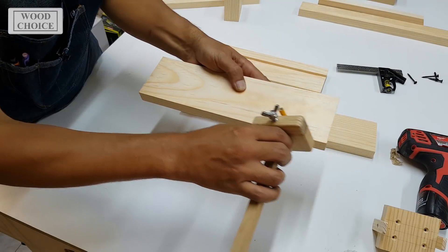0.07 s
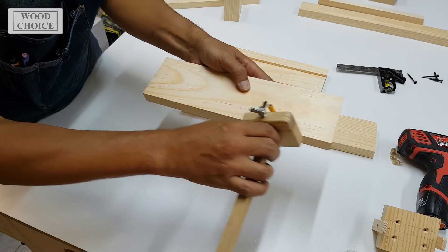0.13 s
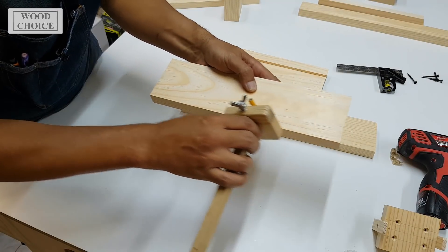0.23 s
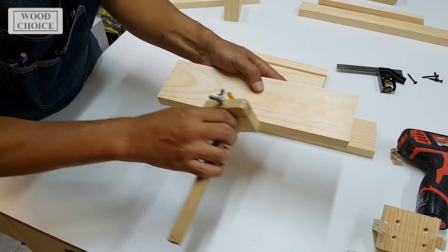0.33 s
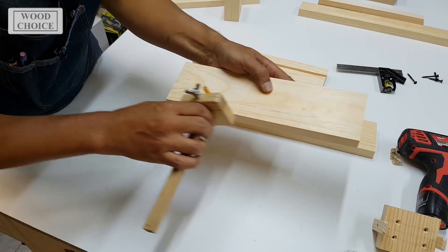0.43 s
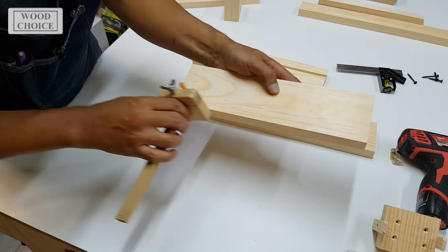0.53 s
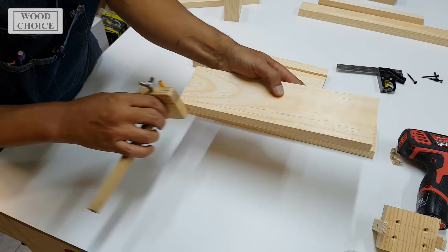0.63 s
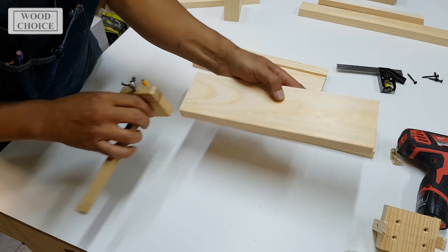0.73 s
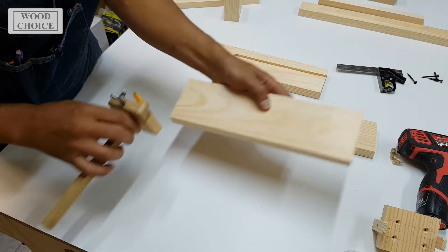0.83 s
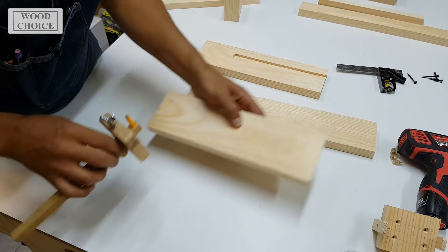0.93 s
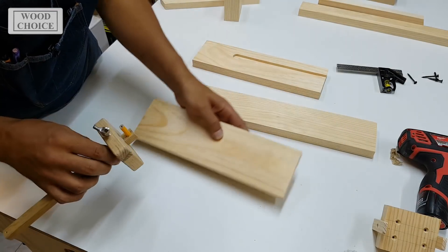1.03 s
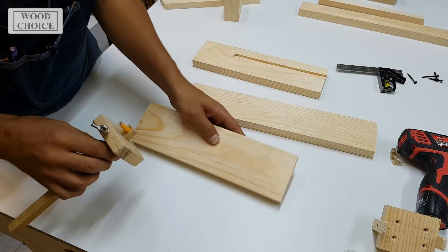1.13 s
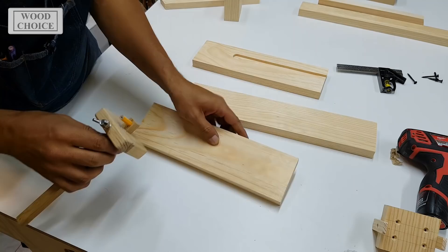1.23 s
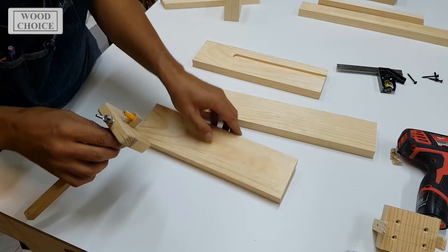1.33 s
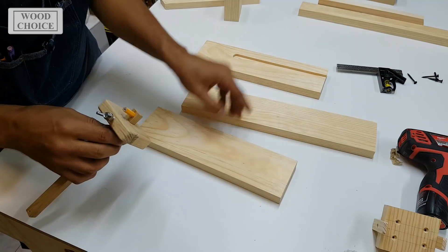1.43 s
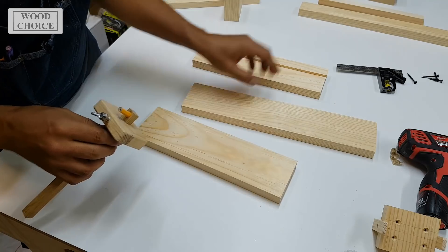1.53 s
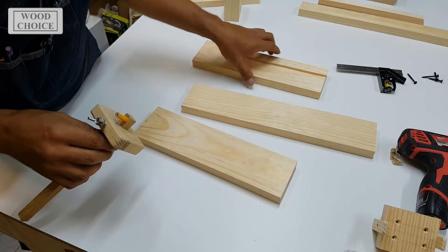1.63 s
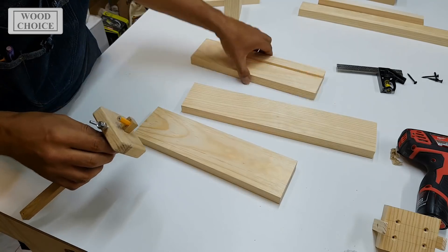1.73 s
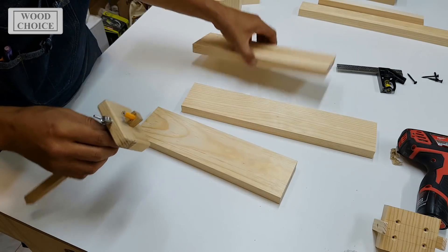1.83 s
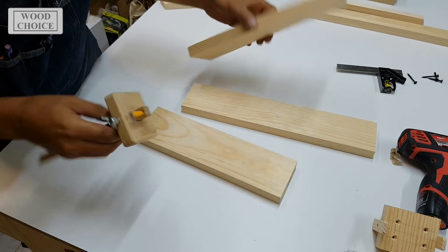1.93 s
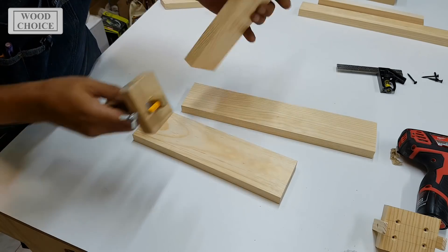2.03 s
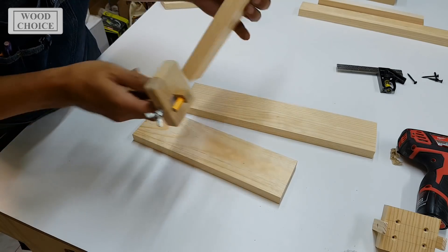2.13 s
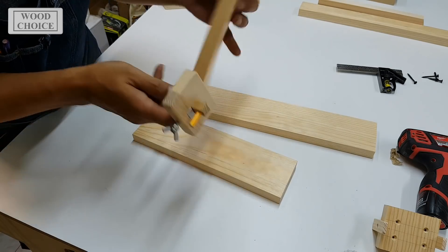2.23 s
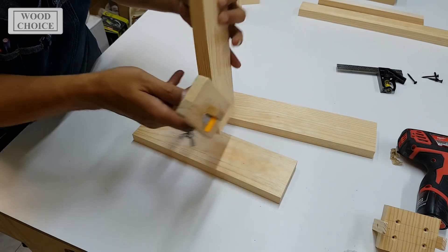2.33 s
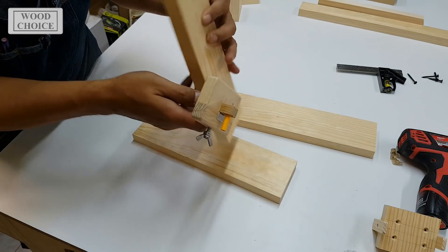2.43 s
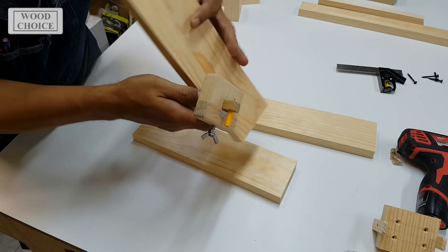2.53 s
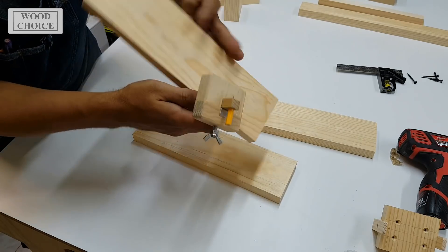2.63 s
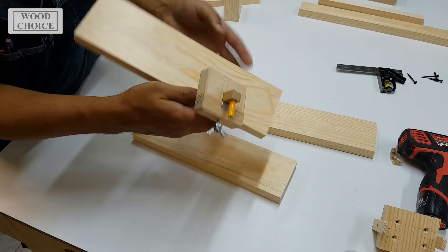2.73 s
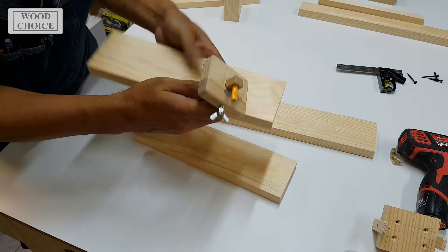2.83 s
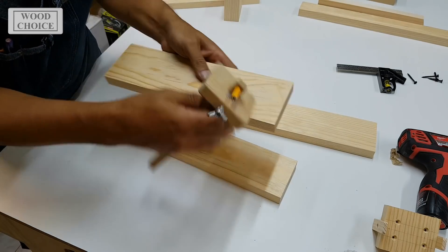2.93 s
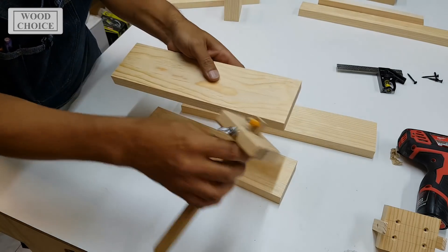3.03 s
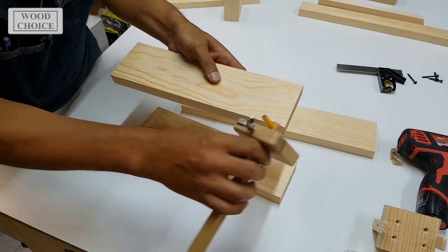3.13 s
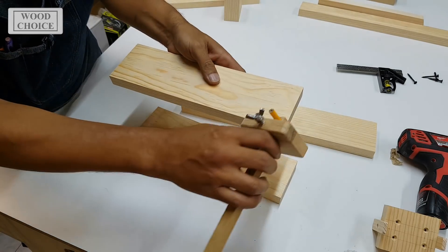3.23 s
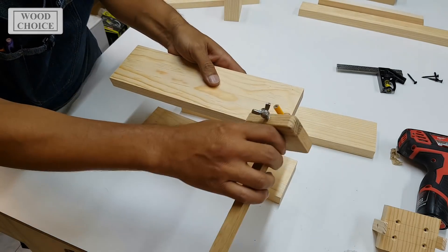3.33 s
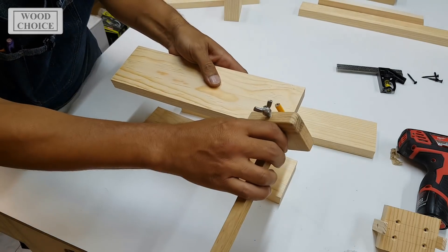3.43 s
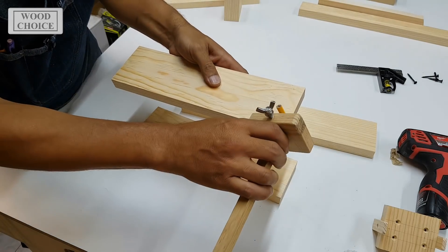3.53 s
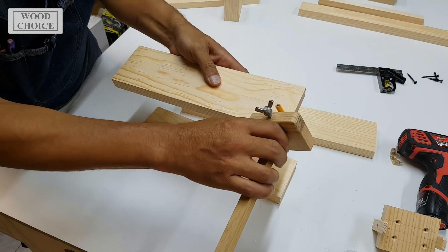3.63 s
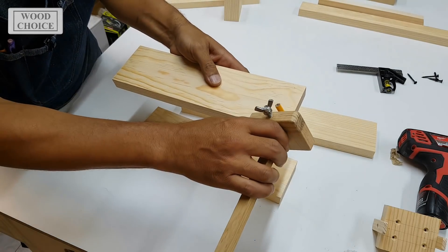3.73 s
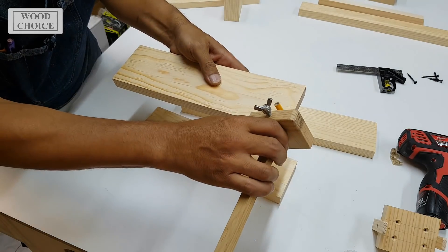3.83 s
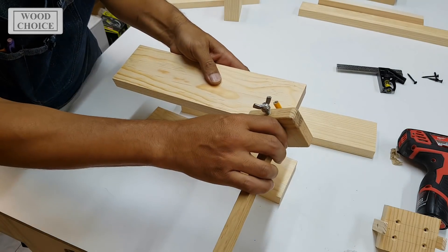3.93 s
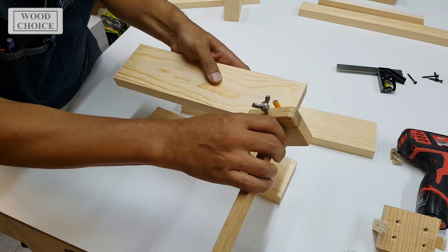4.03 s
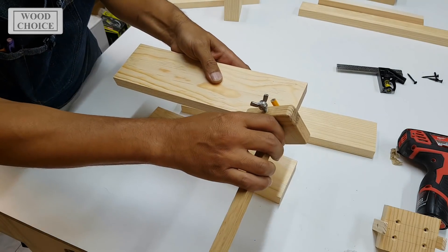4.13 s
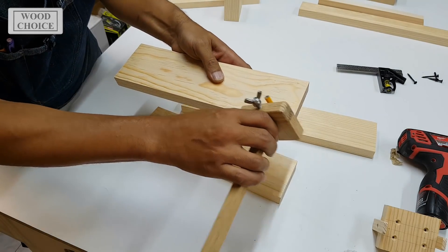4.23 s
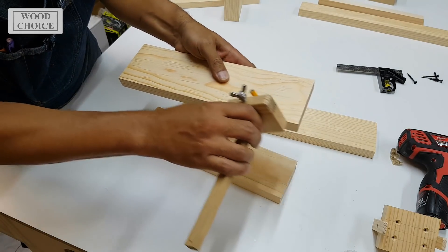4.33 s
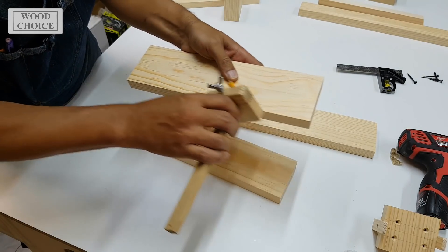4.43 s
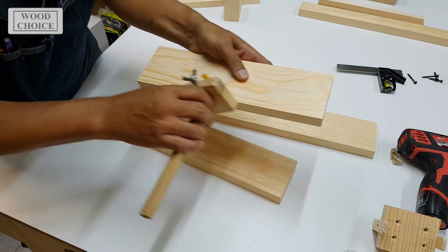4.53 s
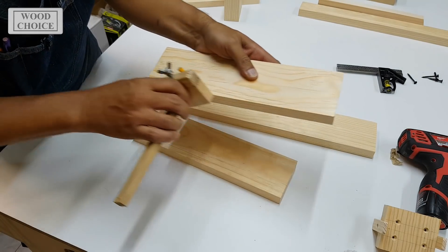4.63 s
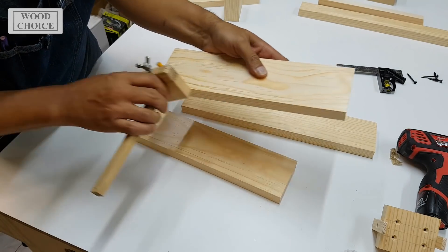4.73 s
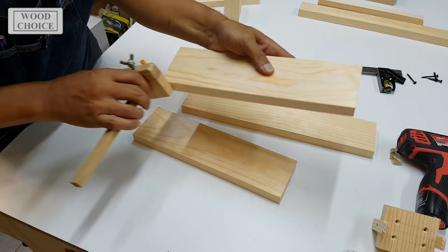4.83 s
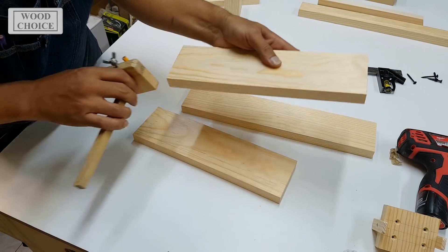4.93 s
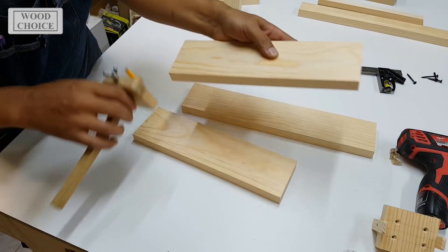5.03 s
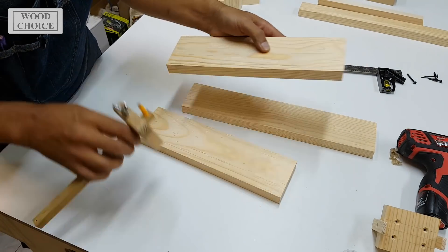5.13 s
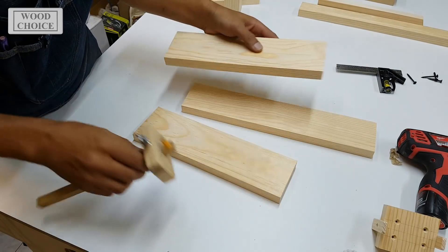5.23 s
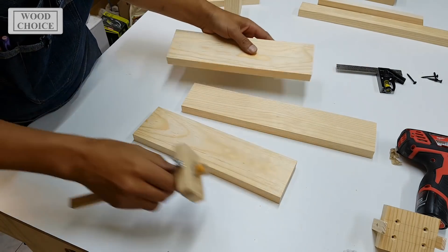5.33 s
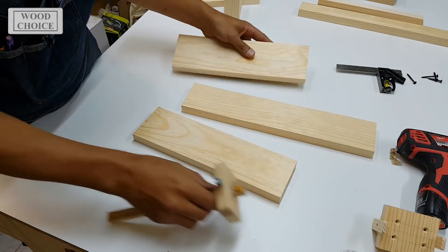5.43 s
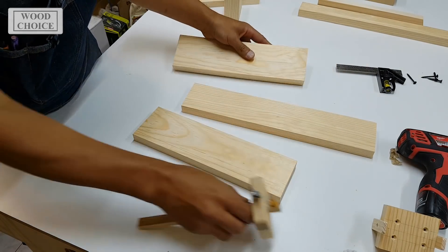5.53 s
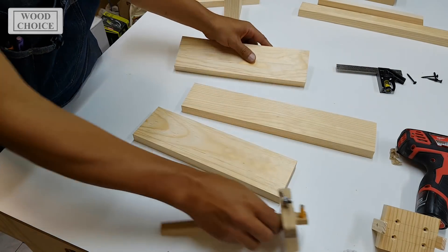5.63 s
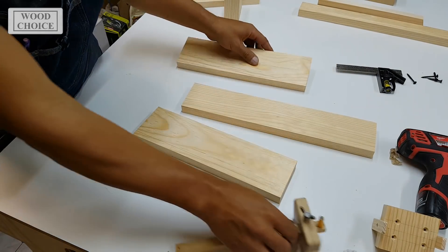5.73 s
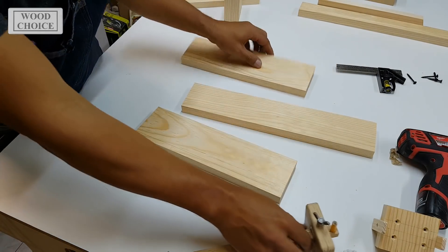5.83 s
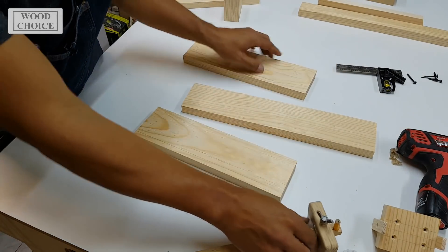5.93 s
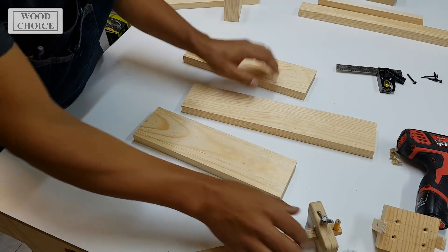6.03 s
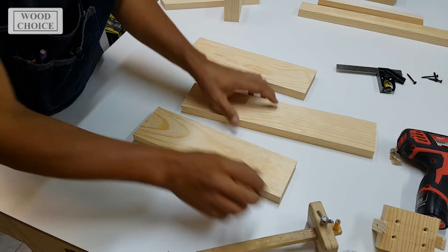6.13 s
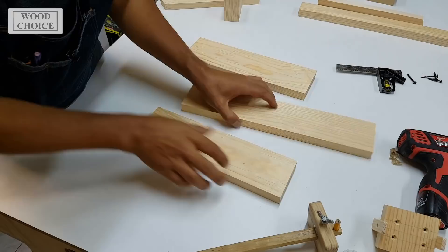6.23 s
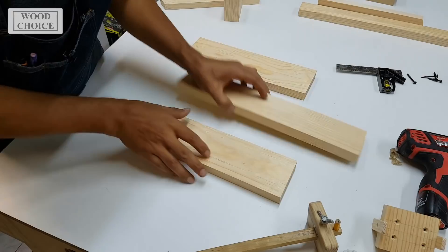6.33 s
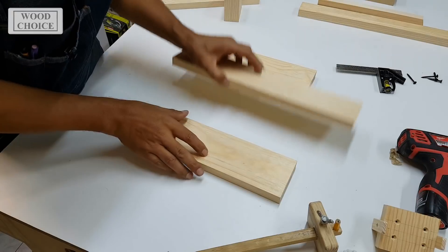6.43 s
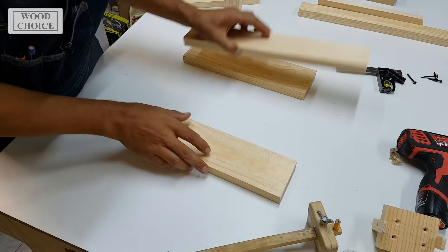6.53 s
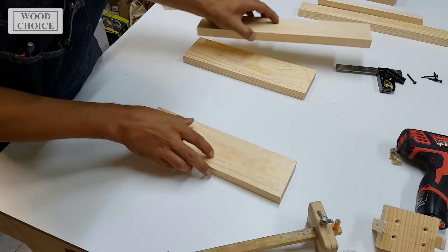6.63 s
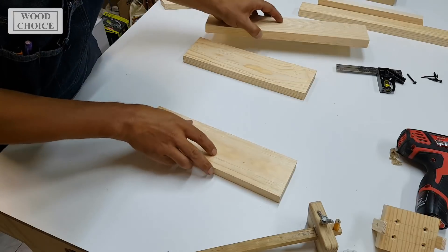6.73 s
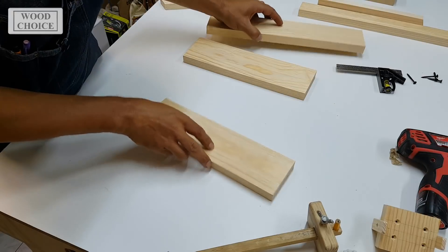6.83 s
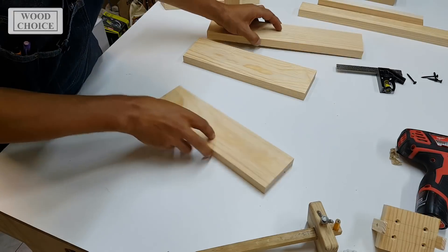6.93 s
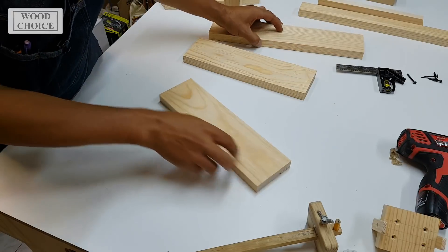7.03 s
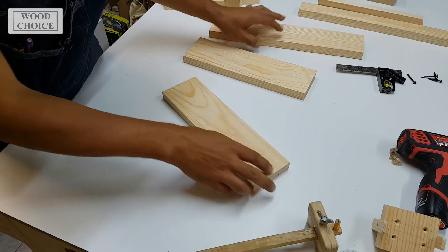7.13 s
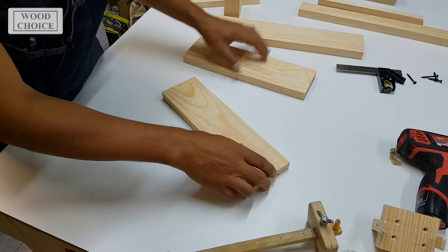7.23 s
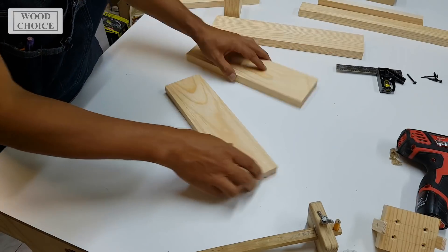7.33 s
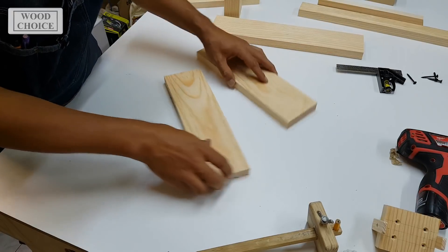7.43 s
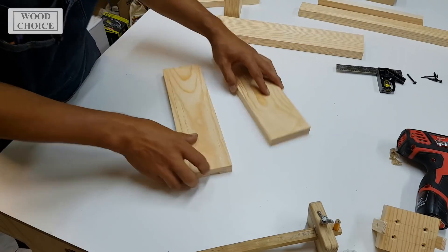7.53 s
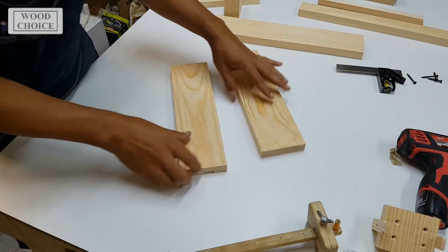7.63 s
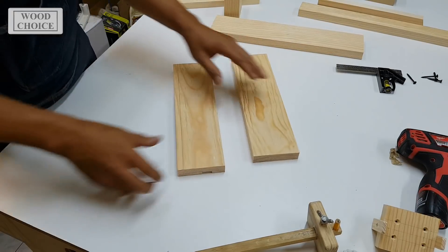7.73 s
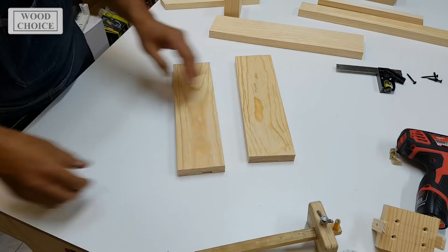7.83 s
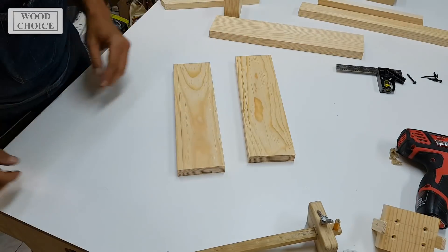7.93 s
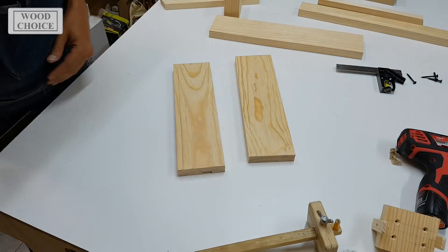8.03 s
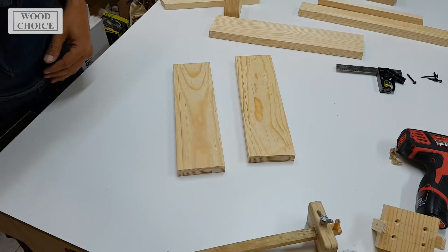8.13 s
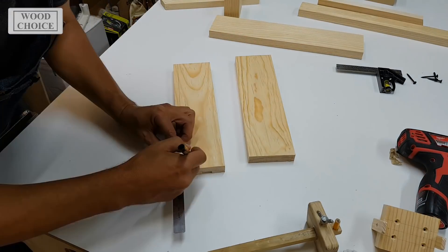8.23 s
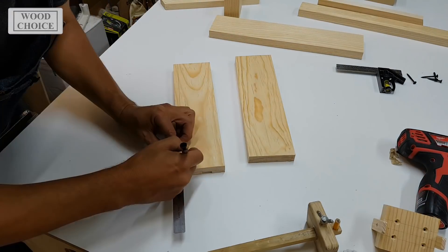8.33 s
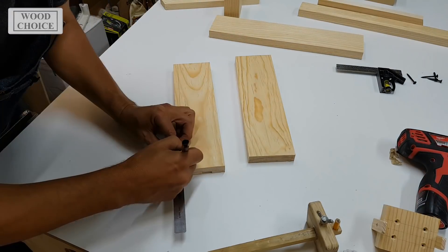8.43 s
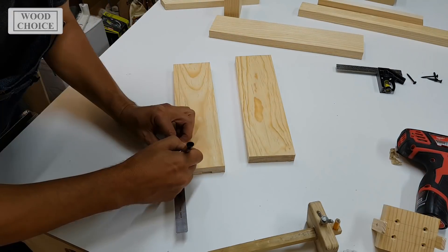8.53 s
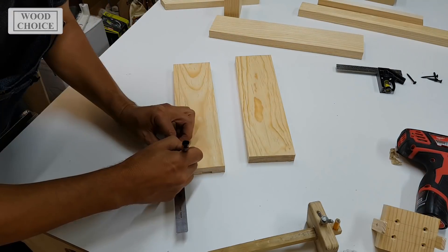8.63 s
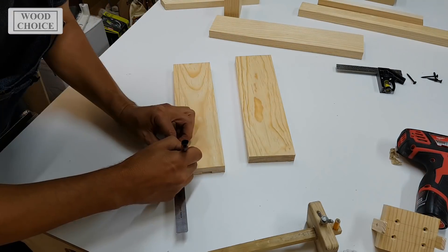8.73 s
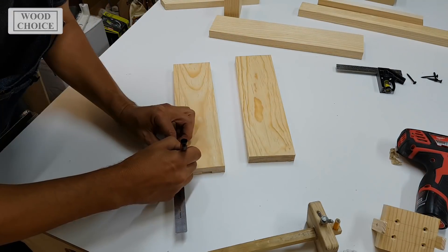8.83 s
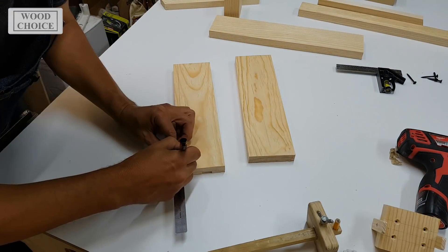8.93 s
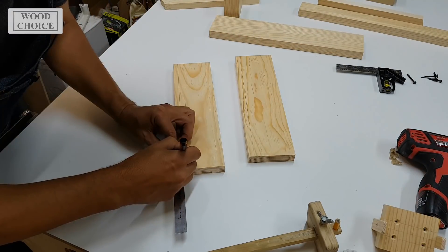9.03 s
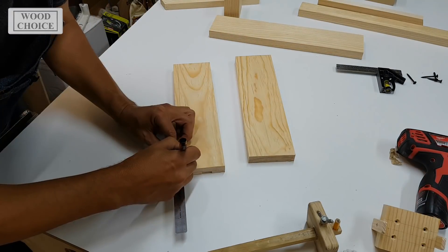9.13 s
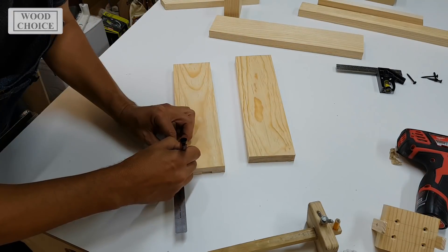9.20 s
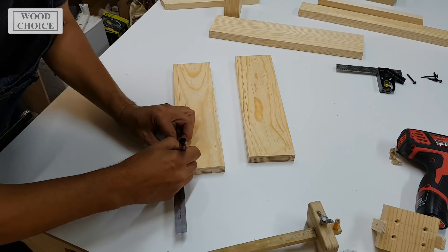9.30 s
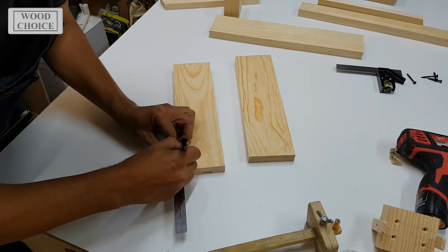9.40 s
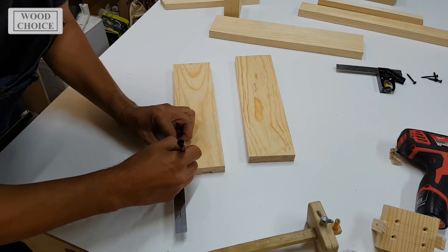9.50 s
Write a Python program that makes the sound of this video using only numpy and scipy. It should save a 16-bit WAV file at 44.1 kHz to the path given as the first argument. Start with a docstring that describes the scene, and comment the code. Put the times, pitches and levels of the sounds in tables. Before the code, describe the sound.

A gauge pin scratches along pine boards, which then clack loudly onto a workbench in a small hard room, with an engine droning outside.

```python
"""Scribing pine boards in a workshop

Pine boards are handled on a workbench in a small, hard-walled workshop, close to the microphone.
A marking gauge scribes two boards (filtered slips); boards and gauge rub, slide (coloured slips) and
strike the bench (short pushes into damped modes). A fan hums (coloured noise and tones), and from
about 5 s an engine, probably a motorbike, drones through the wall (harmonics of its firing rate).
Levels in the tables are relative within each layer."""
import sys
import numpy as np
from scipy import signal
from scipy.fft import rfft, irfft, next_fast_len
from scipy.io import wavfile
from scipy.ndimage import uniform_filter1d, minimum_filter1d

SR = 44100
rng = np.random.default_rng(int(sys.argv[2]) if len(sys.argv) > 2 else 0)


def digitize_waveform(pressure):
    """Quantize a signal to 16-bit integers and store it at the path in sys.argv[1].

    Rows of a 2-D input are taken as channels; values are limited to [-1, 1].
    """
    field = np.atleast_2d(pressure).T
    bounded = np.clip(field, -1, 1)
    quanta = np.round(bounded * 32767).astype(np.int16)
    wavfile.write(sys.argv[1], SR, quanta)


N = 421816  # length in samples


def undb(db):
    """Decibels to gain."""
    return 10 ** (np.asarray(db) / 20)


def unit(x):
    """Scale to rms 1."""
    return x / np.sqrt(np.mean(x ** 2))


def ramp(x):
    """Rise from 0 to 1 and stay there."""
    return np.clip(x, 0, 1)


def walk(rate):
    """Smooth random drift with a spread a little under 1, taking about `rate` new values a second."""
    hold = int(SR / rate)
    steps = np.repeat(rng.standard_normal(N // hold + 1), hold)
    return uniform_filter1d(steps, hold)[:N]


def swells(rows):
    """Gain of short, rounded movements: each a half sine in time."""
    gain = np.zeros(N)
    for start_s, length_s, db in rows:
        span = np.arange(int(start_s * SR), min(int((start_s + length_s) * SR), N))
        gain[span] += undb(db) * np.sin(np.pi * (span / SR - start_s) / length_s)
    return gain


def on_bins(hz, values, size):
    """Values joined on a log-frequency axis, at the bins of a transform."""
    bins_hz = np.fft.rfftfreq(size, 1 / SR)
    return np.interp(np.log(bins_hz + 1), np.log(hz), values)


def colour(x, points):
    """Give a sound the spectrum (f/Hz, level/dB); rms 1."""
    size = next_fast_len(len(x))
    hz, db = np.transpose(points)
    shaped = rfft(x, size) * undb(on_bins(hz, db, size))
    return unit(irfft(shaped, size)[:len(x)])


def snap(points, size=1024):
    """Minimum-phase click with the spectrum (f/Hz, level/dB), by folding its cepstrum; energy 1."""
    hz, db = np.transpose(points)
    cepstrum = irfft(np.log(undb(on_bins(hz, db, size))))
    cepstrum[1:size // 2] *= 2
    cepstrum[size // 2 + 1:] = 0
    click = irfft(np.exp(rfft(cepstrum)))
    return click / np.linalg.norm(click)


def ring(modes):
    """Response of damped modes (f/Hz, level/dB, t60/s) to a tap; energy 1."""
    t = np.arange(SR // 2) / SR
    response = np.zeros(len(t))
    for k, (hz, db, t60) in enumerate(modes):
        sign = (-1) ** k  # neighbouring modes start in opposite directions
        response += sign * undb(db - 60 * t / t60) * np.sin(2 * np.pi * hz * t)
    return response / np.linalg.norm(response)


def through(x, response):
    """Play a sound through a response."""
    return signal.fftconvolve(x, response)[:N]


def band(x, hz, width):
    """A resonance with steep sides; rms 1."""
    edges = [hz - width / 2, hz + width / 2]
    return unit(signal.sosfilt(signal.butter(2, edges, "bandpass", fs=SR, output="sos"), x))


def friction(spread_db, patchy_db, patch_rate):
    """Dense slips of uneven size, coming in patches as the grain passes; rms 1."""
    slips = rng.standard_normal(N) * undb(spread_db * rng.exponential(size=N))
    return unit(slips * undb(patchy_db * walk(patch_rate)))


# reverberation of the workshop: (f/Hz, level/dB, t60/s)
ROOM_BANDS = [(70, -21.5, .5), (151, 3, 1), (350, -1.5, 0.45), (700, -2.5, 0.57), (1510, -4, 0.44),
              (2880, -7, 0.56), (5600, -11, 0.53), (9400, -17.5, 0.34), (15000, -24, .2)]


def workshop(x, wet_db, first_s=0.0028, build_s=0.0066):
    """Add dense reflections that build up within milliseconds; each band decays at its own pace."""
    t = np.arange(SR) / SR
    noise = rfft(rng.standard_normal(SR))
    onset = ramp((t - first_s) / build_s)
    centres = [row[0] for row in ROOM_BANDS]
    response = 0
    for share, (hz, db, t60) in zip(np.eye(len(ROOM_BANDS)), ROOM_BANDS):
        fade = onset * np.exp(-np.log(1000) * t / t60)
        band_noise = irfft(noise * on_bins(centres, share, SR), SR)
        response = response + undb(db) * band_noise * fade / np.linalg.norm(fade)
    return x + undb(wet_db) * through(x, response)


# spectrum of the moving air: (f/Hz, level/dB)
AIR_COLOUR = [(15, -26.5), (25, -7), (126, 0.5), (148, -2.5), (253, -2.5), (281, -5.5), (322, -4),
              (368, -10.5), (399, -5.5), (445, -9), (703, -10.5), (762, -11.5), (945, -18.5), (2700, -23),
              (15500, -55)]
# tones of the fan: (f/Hz, rms level/dB)
FAN_TONES = [(253, -55.5), (398.4, -57), (742.9, -56.5)]


def fan():
    """Moving air as coloured noise, with a few slightly wavering tones."""
    sound = colour(rng.standard_normal(N), AIR_COLOUR) * undb(-44 + 0.36 * walk(4.1))
    for hz, db in FAN_TONES:
        turns = np.cumsum(hz + 0.79 * walk(6)) / SR
        sound = sound + undb(db) * np.sqrt(2) * np.sin(2 * np.pi * turns)
    return sound


# the exhaust as heard through the wall: (f/Hz, level/dB)
EXHAUST_COLOUR = [(35, -55), (70, -32), (95, -3), (125, 10), (160, -7.5), (215, 4.5), (250, 6.5), (285, -3),
                  (320, 2.5), (400, -2.5), (520, -25.5), (1000, -56)]
# pulls between gear changes: (start t/s, end t/s, firing rate at the start f/Hz, climb Hz/s, level/dB)
ENGINE_PULLS = [(5.1, 6.1, 34.79, 0.22, -37), (6.1, 8.27, 30.27, 2.34, -36),
                (8.27, 9.9, 30.75, 1.054, -37.5)]


def engine():
    """Wavering harmonics of a firing rate that climbs in each gear, over a rumble, dulled by the wall."""
    throttle_s = .24  # time to open or close the throttle
    arch_db = 3  # a pull is this much weaker at its ends
    t = np.arange(N) / SR
    firing_hz = np.full(N, 1. * ENGINE_PULLS[0][2])
    throttle = 0
    for start, end, start_hz, climb, db in ENGINE_PULLS:
        firing_hz = np.where(t >= start, start_hz + climb * (t - start), firing_hz)
        arch = (2 * ramp((t - start) / (end - start)) - 1) ** 2
        opening = ramp(np.minimum(t - start, end - t) / throttle_s + .5)
        throttle = throttle + opening * undb(db - arch_db * arch)
    turns = np.cumsum(firing_hz * (1 + 0.0042 * walk(14))) / SR
    exhaust_hz, exhaust_db = np.transpose(EXHAUST_COLOUR)
    notes = 0
    for k in range(2, 15):
        level = undb(np.interp(k * firing_hz, exhaust_hz, exhaust_db) + 0.5 * walk(7.3))
        notes = notes + level * np.sin(2 * np.pi * (k * turns + rng.random()))
    rumble = colour(rng.standard_normal(N), EXHAUST_COLOUR)
    return (undb(-2.0) * unit(notes) + undb(-12.0) * rumble) * throttle


# sleeves and palms brush past: (start t/s, length t/s, peak level/dB)
BRUSH_MOVES = [(6.35, .2, -65.5), (7.88, 0.44, -59.5)]
# spectrum of the rustle: (f/Hz, level/dB)
RUSTLE_COLOUR = [(500, -4), (3000, 10), (7000, -5), (12000, -7), (15000, -11)]


def brushing():
    """Cloth and skin slide with an airy rustle: coloured slips in rounded swells."""
    slips = friction(spread_db=3.5, patchy_db=0.5, patch_rate=30)
    return colour(slips, RUSTLE_COLOUR) * swells(BRUSH_MOVES)


# soft bumps of arms and body against the bench: (start t/s, length t/s, peak level/dB)
BODY_BUMPS = [(6.33, 0.42, -42.5), (6.78, 0.42, -32.5), (7.1, 0.29, -37.5), (7.55, 0.33, -42),
              (7.76, 0.26, -37), (8.04, 0.24, -38)]


def bumps():
    """Soft bodies push the bench slowly, so only low, coloured noise swells up."""
    spectrum = [(30, -16), (75, -3), (140, 0), (260, -8), (600, -20), (2000, -38), (12000, -75)]
    return colour(rng.standard_normal(N), spectrum) * swells(BODY_BUMPS)


# short rubs and squeaks: (start t/s, length t/s, level/dB, squeak f/Hz)
BOARD_RUBS = [(2.14, 0.063, -49.5, 1770), (2.226, 0.15, -50, 1168), (2.404, 0.18, -55, 1177),
              (2.57, 0.11, -55.5, 1140), (2.673, 0.044, -43, 1177), (2.76, 0.045, -52.5, 3600),
              (2.901, 0.075, -49.5, 1187), (4.52, 0.096, -52.5, 1210), (4.893, 0.026, -50, 1184),
              (4.927, 0.054, -61, 8660), (6.355, 0.041, -58, 1860)]


def rubs():
    """Fingers and gauge rub the board: slips excite its modes, each touch favouring one pitch."""
    slips = friction(spread_db=1.5, patchy_db=4.5, patch_rate=50)
    modes = through(slips, ring(BOARD_MODES))
    # small, sharp slips reach the board's upper modes and hiss a little
    upper = colour(modes, [(1000, -19.5), (3000, -7), (5000, 2.5), (7000, 8), (15000, 5)])
    hiss = colour(slips, [(500, -8), (2500, 5), (6500, -9), (9000, -19), (15000, -17)])
    wood = unit(modes) + undb(-5.5) * upper + undb(-10.5) * hiss
    sound = 0
    for start_s, length_s, db, hz in BOARD_RUBS:
        squeak = band(slips, hz, hz / 20)
        sound = sound + (wood + squeak) * swells([(start_s, length_s, db)])
    return sound


# boards pushed over the bench and nudged into line:
# (fastest t/s, time to gather speed t/s, time to stop t/s, level/dB)
BOARD_SLIDES = [(7.5, 0.1, 0.18, -36), (7.89, 0.093, 0.078, -48), (8.15, 0.11, .11, -49.5)]
# spectrum of a board sliding flat: (f/Hz, level/dB)
FLAT_BOARD_COLOUR = [(35, -49), (60, -15), (83, -11), (141, -0.5), (209, -6.5), (324, 2), (469, -3),
                     (551, -7.5), (816, -10), (1080, -17), (1330, -12), (1670, -15.5), (1880, -20),
                     (3340, -25), (15000, -54)]


def sliding():
    """A board lying flat is damped, so its slips sound broad and hollow; level follows its speed."""
    t = np.arange(N) / SR
    slips = friction(spread_db=2.0, patchy_db=-0.4, patch_rate=49)
    speed = 0
    for fastest, gather, stop, db in BOARD_SLIDES:
        side = np.where(t < fastest, gather, stop)
        speed = speed + undb(db) * np.exp(-((t - fastest) / side) ** 2)
    return undb(7.5) * colour(slips, FLAT_BOARD_COLOUR) * speed


# strokes of the gauge pin:
# (start t/s, at full speed t/s, leaves the board t/s, level/dB, gliding resonance level/dB)
PIN_STROKES = [(-.1, 0.558, 0.738, -44.5, -7), (4.198, 4.557, 4.955, -47.5, -21)]
# resonances that the pin scratches in the grain: (f/Hz, width f/Hz, level/dB, rise over a stroke dB)
GRAIN_RESONANCES = [(1163, 128, -4, 1.5), (1726, 240, -11, 2), (2520, 240, -9, -1), (2970, 240, -5, 6),
                    (3500, 460, -4.5, 2.5), (4600, 210, -12, -8), (5840, 560, -5, 1),
                    (6100, 1040, -18, -13), (8400, 890, -20.5, 0), (11200, 5000, -19, 5)]


def scribing():
    """The gauge pin tears through the grain; resonances trade places along the board, one glides down."""
    rise_db, sag_db_per_s = 15, 10  # the hand gathers speed, then eases off
    lift_s = .035  # the pin bites, and runs off the end, in this time
    n = np.arange(N)
    t = n / SR
    slips = friction(spread_db=2.0, patchy_db=1.5, patch_rate=55)
    gain, progress, glide = 0, 0, 0  # progress runs from -0.5 to 0.5 over a stroke
    for start, full, end, db, glide_db in PIN_STROKES:
        touching = ramp((t - start) / lift_s) * ramp(1 - (t - end) / lift_s)
        gathering = rise_db * ramp((full - t) / (full - start))
        easing = sag_db_per_s * np.maximum(t - full, 0)
        gain = gain + touching * undb(db - gathering - easing)
        progress = progress + (touching > 0) * (ramp((t - start) / (end - start)) - .5)
        glide = glide + touching * undb(glide_db)
    scratch = 0
    for hz, width, db, change_db in GRAIN_RESONANCES:
        level = undb(db + change_db * progress + 3.6 * walk(10.0))
        scratch = scratch + band(slips, hz, width) * level
    glide_hz = 5300 + (3380 - 5300) * (progress + .5)  # sinks as the pin nears the end of the board
    carrier = np.sin(2 * np.pi * np.cumsum(glide_hz) / SR)
    scratch = scratch + glide * unit(walk(400) * carrier)  # the drift widens the tone into a band
    # the changing pressure of the hand bends the pitches
    scratch = np.interp(n + np.cumsum(.03 * walk(14)), n, scratch)
    return (undb(-4.5) * scratch + undb(-6) * colour(slips, CRACK_COLOUR)) * gain


# spectrum of a contact's crack, and of the pin's raw tearing: (f/Hz, level/dB)
CRACK_COLOUR = [(40, -36), (150, -15), (400, 5), (800, 10), (1750, 6.5), (2400, 2.5), (3700, 1), (4800, -9),
                (6500, -11), (8000, -13), (10500, -15.5), (15000, -29.5)]


def strike(contact_hz, spot_hz, t, click):
    """A contact pushes, longer if soft, and cracks; the spot rings briefly, then scatter and bounces."""
    push = t ** 3 * np.exp(-2 * np.pi * 1.7 * contact_hz * t)
    push /= push.sum()
    spot = np.exp(-spot_hz * t / 1.26) * np.sin(2 * np.pi * spot_hz * t)
    spot /= np.linalg.norm(spot)
    crack = through(push, undb(-3) * click + undb(-9.0) * spot)[:len(t)]
    # the crack scatters through the wood, densest after 0.8 ms
    scatter = rng.standard_normal(len(t)) * t * np.exp(-t / .0008)
    scatter /= np.linalg.norm(scatter)
    # the piece chatters: six bounces within 50 ms, each 25 dB below the crack
    bounce_at = (rng.random(size=6) * .05 * SR).astype(int)
    bounces = np.bincount(bounce_at, minlength=len(t))
    after = undb(-4.5) * scatter + undb(-25) * bounces
    return push, crack + through(crack, after)[:len(t)]


# blows of wood on wood: (t/s, crack level/dB, contact cut-off f/Hz (about -6 dB), struck spot f/Hz,
# bench knock level/dB, ring level/dB, piece that rings, place on the bench)
BLOWS = [ (1.1627, 6, 1150, 485, 15.5, 16, "board", "middle"),
         (1.1671, -1, 700, 450, 13.5, -9, "board", "middle"),
         (1.188, 12.5, 4600, 1480, 5, 15, "board", "middle"),
         (1.2255, 9.5, 2500, 1780, 12.5, 4.5, "board", "middle"),
         (1.456, 14.5, 6200, 1000, 16.5, 7.5, "rail", "middle"),
         (1.704, -32, 600, 416, -5, -29, "board", "middle"),
         (1.76, -17, 4000, 957, -6.5, -21, "board", "middle"),
         (3.396, -13.5, 7300, 2320, -34, -5.5, "gauge", "middle"),
         (5.549, 10, 845, 450, 17, 8.5, "board", "edge"), (5.594, 3, 1395, 520, 11.5, 2.5, "board", "edge"),
         (5.6431, 4, 795, 610, 12.5, 4, "board", "edge"),
         (5.6562, 15, 1270, 860, 12, 11.5, "board", "edge"),
         (5.7692, 18.5, 1370, 1250, 14, 6, "board", "edge"),
         (5.8132, 22, 2860, 990, 11.5, 15.5, "rail", "edge"),
         (5.815, 10.5, 5600, 4000, -12, -16, "rail", "edge"),
         (5.9375, 20, 4400, 651, 18, 9, "rail", "edge"),
         (6.223, -10, 2400, 700, -5.5, -22, "board", "middle"),
         (6.9815, 8.5, 4400, 2600, -1.5, 10.5, "rail", "middle"),
         (6.9924, -7, 1220, 627, 5.5, 13, "rail", "middle"),
         (7.04, -3, 1500, 1910, -2.5, 8.5, "rail", "middle"),
         (7.053, 15, 700, 684, -4, -15, "rail", "middle")]
# light ticks as hands touch boards and tools: (t/s, level/dB)
HAND_TICKS = [(5.5213, -19.5), (6.412, -23.5), (8.251, -27)]
# the pieces' own modes, a short board held in the hand, a longer rail and the gauge:
# (f/Hz, level/dB, t60/s)
BOARD_MODES = [(1110, 0.5, 0.052), (1184, 9.5, 0.1), (1430, -5, 0.017), (1790, -6.5, 0.065),
               (2400, -11, 0.02), (2840, 2, 0.033), (3660, -14.5, .03), (4800, -15.5, 0.032),
               (5420, -21.5, 0.024), (6890, -27, 0.027)]
RAIL_MODES = [(433, -5.5, 0.1), (624, -14.5, 0.45), (1076.5, -11.5, 0.09), (1311, -2, 0.063),
              (1585, -13, 0.068), (1916, 5.5, 0.022), (2223, 1.5, 0.023), (2437, 7, 0.013),
              (3420, -19, 0.035)]
GAUGE_MODES = [(1156, 3.5, 0.062), (2200, -6, 0.024), (2450, -2.5, 0.056), (3500, -7, 0.031),
               (5600, -16, .03)]
# the dead knock of the bench top: (f/Hz, level/dB)
TOP_KNOCK = [(40, -46), (110, -4.5), (220, 0.5), (330, 10.5), (430, 3.5), (560, -2.5), (800, -12.5),
             (1500, -17.5), (4000, -53), (15000, -43)]
# low tones that a knock leaves ringing in the bench and the room: (f/Hz, level/dB, t60/s)
LASTING_TONES = [(272, 5.5, 0.28), (319.9, 4.5, 0.54), (360, -22.5, 1), (373.3, -1.5, 0.66),
                 (372, -33.5, 0.25), (433, 5.5, 0.36), (470, -7.5, 0.41), (604, -3, 0.38), (692, -12, 0.81),
                 (703, -3.5, 0.34), (806, -29.5, 0.99), (957, -8.5, 0.38), (1020, -9.5, 0.66)]
# the bench frame and the air under it: (f/Hz, level/dB, t60/s)
FRAME_MODES = [(87.5, -2, 0.46), (117.2, -0.5, 0.5), (142.15, 0, 0.82), (153.7, 4.5, 0.45),
               (185, 1.5, 0.48), (213.8, -8.5, 0.51), (246.4, -13, 0.4)]
# the bench booms where it is free to flex, less so over its frame: place -> boom above the knock, level/dB
PLACE_BOOM = {"middle": 3.5, "edge": -10}


def knocks():
    """Each blow cracks at the contact, rings the piece, knocks the bench and leaves low tones and a boom."""
    t = np.arange(SR // 5) / SR
    click = snap(CRACK_COLOUR, size=len(t))
    pieces = {"board": ring(BOARD_MODES), "rail": ring(RAIL_MODES), "gauge": ring(GAUGE_MODES)}
    cracks, tone, gauge, top, frame = np.zeros((5, N))
    for s, crack_db, contact_hz, spot_hz, top_db, ring_db, piece, place in BLOWS:
        push, crack = strike(contact_hz, spot_hz, t, click)
        start = int(s * SR)
        span = slice(start, start + len(t))
        ringing = gauge if piece == "gauge" else tone
        cracks[span] += undb(crack_db) * crack
        ringing[span] += undb(ring_db) * through(push, pieces[piece])[:len(t)]
        top[span] += undb(top_db) * push
        frame[span] += undb(top_db + PLACE_BOOM[place]) * push
    for s, db in HAND_TICKS:
        start = int(s * SR)
        _, crack = strike(11000, 5400, t, click)
        cracks[start:start + len(t)] += undb(db) * crack
    dead = undb(-1) * workshop(cracks, wet_db=0.5)
    dead = dead + workshop(through(top, snap(TOP_KNOCK)), wet_db=-2.0)
    lasting = undb(-3.5) * through(top, ring(LASTING_TONES)) + undb(-1.5) * through(frame, ring(FRAME_MODES))
    # a ringing piece faces the microphone, so less of it comes by way of the walls
    rings = workshop(tone, wet_db=-2.5)
    rings = rings + workshop(gauge, wet_db=-13)  # the gauge is held close under the microphone
    return undb(2.5) * (dead + lasting + rings)


def scene():
    """Work at the bench, in its room, over the background."""
    background = fan() + engine()
    handling = undb(2.0) * workshop(rubs() + bumps(), wet_db=-3.0)
    pushing = workshop(sliding(), wet_db=-1.5)
    marking = undb(1.06) * workshop(scribing(), wet_db=-1)
    return (background + brushing() + handling + pushing + marking + knocks())[None]


def record(dry):
    """A very fast limiter holds the loudest blows near full scale; the top is cut above 15.4 kHz."""
    gain = 1 / np.maximum(np.abs(dry), 1)
    gain = uniform_filter1d(minimum_filter1d(gain, size=20), size=20)
    top_cut = signal.ellip(8, .2, 70, 15400, fs=SR, output="sos")
    return signal.sosfilt(top_cut, dry * gain)


dry = scene()
out = record(dry)
digitize_waveform(out)
```